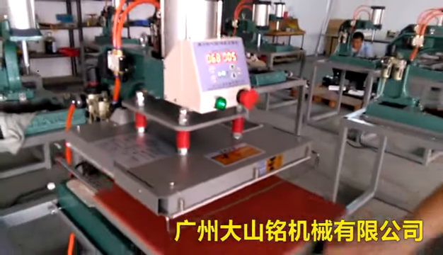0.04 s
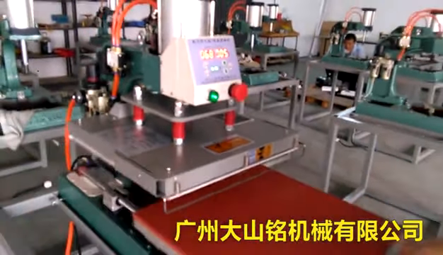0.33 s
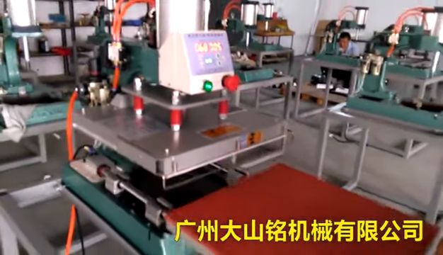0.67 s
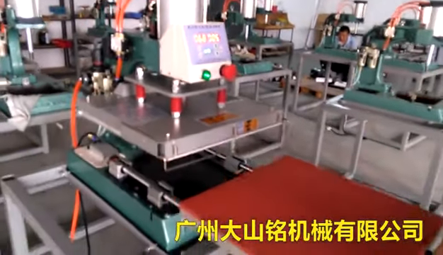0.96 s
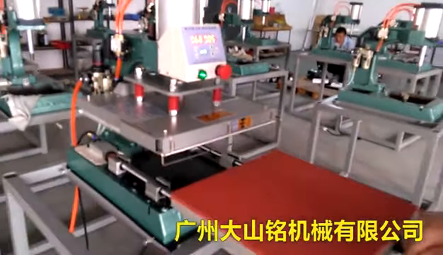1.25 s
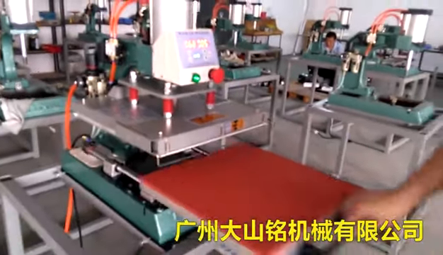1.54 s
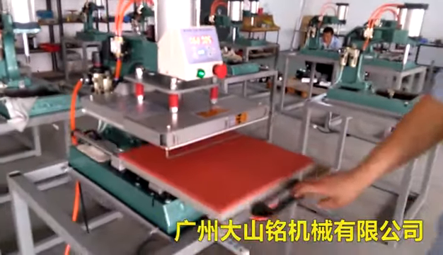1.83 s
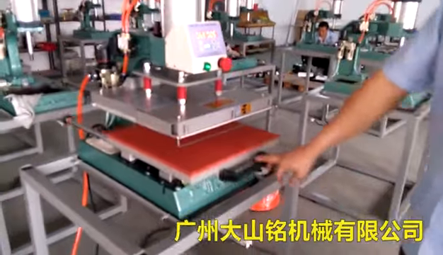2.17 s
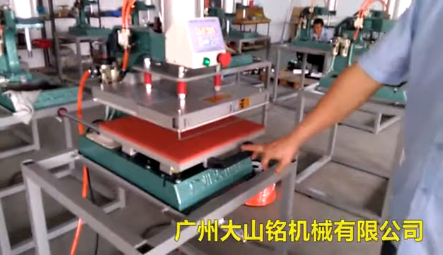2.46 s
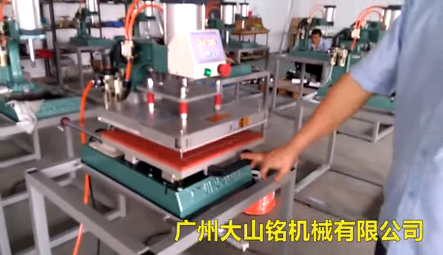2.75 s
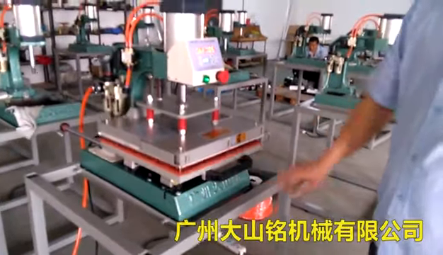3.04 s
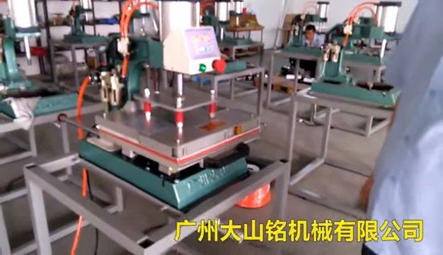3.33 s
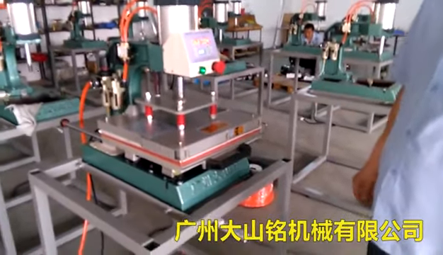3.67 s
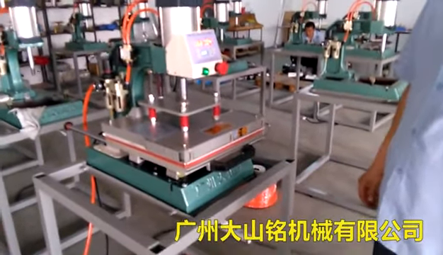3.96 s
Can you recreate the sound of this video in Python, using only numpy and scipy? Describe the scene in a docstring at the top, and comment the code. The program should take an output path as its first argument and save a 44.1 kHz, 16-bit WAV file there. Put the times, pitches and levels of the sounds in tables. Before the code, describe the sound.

A wheel grinds metal with a loud, high hiss over humming motors in a machine shop. Close by, a press tray rolls out and back, then air hisses briefly while the grinding rings with shrill tones.

```python
"""A spinning wheel grinds metal in a machine shop: its grit rings the workpiece in a loud hiss,
and tones sing out as the wheel bites. Motors hum and the hall roars behind it.
Close by, the tray of a pneumatic heat press rolls out and back in on ball-bearing rails,
then air hisses from the cylinder as the platen comes down."""
import sys
import numpy as np
from scipy import signal
from scipy.fft import rfft, irfft
from scipy.io import wavfile
from scipy.ndimage import map_coordinates

SR = 44100
rng = np.random.default_rng(int(sys.argv[2]) if len(sys.argv) > 2 else 0)


def store_wav(level_fs):
    """Save 16-bit WAV to argv[1]."""
    pcm = np.round(np.clip(np.atleast_2d(level_fs), -1, 1) * 32767)
    wavfile.write(sys.argv[1], SR, pcm.T.astype(np.int16))


N = 176400
T = np.arange(N) / SR
FREQ_HZ = np.fft.rfftfreq(N, 1 / SR)
TURN_HZ, CUTOFF_HZ = 41.165, 7580


def from_db(db):
    """Decibels to gain."""
    return 10 ** (np.asarray(db) / 20)


def unit_rms(x):
    """Scale to rms 1."""
    return x / np.sqrt(np.mean(x ** 2) + 1e-20)


def envelope(rows):
    """Gain over time from (time [s], level [dB]) rows."""
    return from_db(np.interp(T, *np.transpose(rows)))


def drift(rate_hz):
    """Random wander, mostly below rate_hz; rms 1."""
    steps = np.arange(-SR, N + SR, 50)
    hz = np.fft.rfftfreq(len(steps), 50 / SR)
    slow = irfft(rfft(rng.standard_normal(len(steps))) / (1 + (hz / rate_hz) ** 2), len(steps))
    return np.interp(T * SR, steps, unit_rms(slow))


def coloured(x, points):
    """Filter by (frequency [Hz], gain [dB]) points, steep beyond the ends; rms 1."""
    hz, db = np.transpose(points)
    f = FREQ_HZ + 1e-3
    skirts = np.minimum(1, np.minimum(f / hz[0], hz[-1] / f)) ** 6
    gain = from_db(np.interp(np.log(f), np.log(hz), db))
    return unit_rms(irfft(rfft(x) * skirts * gain, N))


def patchy(x, centres_hz, depth_db, rate_hz):
    """Each band's level flickers separately; rms 1."""
    spectrum = rfft(x)
    bands = (irfft(spectrum * np.interp(FREQ_HZ, centres_hz, row), N) for row in np.eye(len(centres_hz)))
    return unit_rms(sum(band * from_db(depth_db * drift(rate_hz)) for band in bands))


def resonate(x, modes):
    """Parallel resonances from (frequency [Hz], width [Hz], rms level [dB]) rows."""
    out = 0
    for hz, width_hz, db in modes:
        band = signal.butter(2, [hz - width_hz / 2, hz + width_hz / 2], "band", fs=SR, output="sos")
        out = out + from_db(db) * unit_rms(signal.sosfilt(band, x))
    return out


def stroke(start_s, stop_s, attack_s, release_s):
    """Linear rise centred on start_s, exponential decay from stop_s."""
    rise = np.clip((T - start_s) / attack_s + .5, 0, 1)
    return rise * np.exp(-np.maximum(T - stop_s, 0) / release_s)


def in_hall(x, t60_s=.5, wet_db=-.5):
    """Add the hall's diffuse tail; rms 1."""
    tail = rng.standard_normal(SR) * from_db(-60 * T[:SR] / t60_s)
    wet = signal.fftconvolve(x, tail / np.linalg.norm(tail))[:N]
    return unit_rms(x + from_db(wet_db) * wet)


def hall():
    """Far machines roar, one drones in a cluster of resonances; a low rumble underneath."""
    # spectra: (frequency [Hz], gain [dB])
    roar_colour = [(70, -20.5), (141, -10), (170, -18), (215, -18), (254, -7.5), (301, -10.5), (346, -9.5),
                   (399, -9.5), (452, -2.5), (560, -6.5), (624, -7.5), (680, -4), (760, -5), (900, -10),
                   (1080, -10), (1250, -8.5), (1340, -3.5), (1450, -8.5), (1640, -13.5), (2000, -12.5)]
    rumble_colour = [(12, -2), (25, 2.5), (48, -7.5), (65, -8), (110, -15), (200, -15)]
    # far machine's resonances: (frequency [Hz], width [Hz], relative level [dB])
    drone_modes = [(815, 39, -3.5), (884.7, 23.7, -2), (938.5, 33.4, 0), (990, 32, -4)]
    # envelopes: (time [s], level [dB])
    roar_level = [(0, -29), (.35, -28.5), (1.1, -31), (2, -33), (3, -30.5), (4, -32.5)]
    drone_level = [(0, -30.5), (.5, -38), (.8, -31.5), (1.05, -35.5), (1.2, -33), (1.7, -29.5),
                   (2.05, -33.5), (2.3, -36), (2.7, -33.5), (3.2, -37), (3.5, -29.5), (3.9, -27)]
    rumble_level = [(0, -37), (.7, -37.5), (1.12, -51), (1.35, -38), (1.72, -44), (2.3, -41.5), (2.8, -38),
                    (3.1, -45.5), (4, -38)]
    roar = coloured(rng.standard_normal(N), roar_colour)
    roar = patchy(roar, np.geomspace(150, 1800, 22), depth_db=3, rate_hz=7.3)
    drone = unit_rms(resonate(rng.standard_normal(N), drone_modes))
    rumble = coloured(rng.standard_normal(N), rumble_colour)
    return envelope(roar_level) * roar + envelope(drone_level) * drone + envelope(rumble_level) * rumble


def motors(waver_hz=1.98, waver_db=4):
    """Motor tones waver on their way through the hall; each swells or dips once."""
    # hum and whine: (frequency [Hz], level [dB], swell time [s], swell [dB], swell width [s])
    tones = [(50.4, -49.5, 0.27, 14, 0.34), (147.6, -59, 4, 7, .5), (251.6, -50, 0.24, 11.5, 0.8),
             (444, -51.5, 3.9, 16, 0.089), (456, -49, 0.18, 12.5, 0.31), (485, -51, 1.1, 14.5, 0.13),
             (513, -49, 2.4, -4, 0.34), (672.5, -53.5, 0.32, 18.5, 0.2), (816, -45, 3.2, 8, 0.1),
             (895, -49.5, 3.5, 18, 1), (932, -44.5, 1.7, 11, 0.33), (1334, -44.5, 0.091, 9.5, 0.75),
             (1397, -49, .7, -3, .4), (2075, -52.5, .1, 15, 0.29)]
    out = 0
    for hz, db, centre_s, peak_db, width_s in tones:
        swell_db = peak_db * np.exp(-.5 * ((T - centre_s) / width_s) ** 2)
        phase = 2 * np.pi * np.cumsum(hz + waver_hz * drift(10.04)) / SR
        out = out + from_db(db + swell_db + waver_db * drift(4.9)) * np.sin(phase)
    return out


def tray(hits_per_s=3000, spread_db=2, rattle_db=3.2):
    """Bearing balls patter along the rails: the tray runs unevenly and booms, the rails hiss."""
    # tray moves: (start [s], stop [s], boom level [dB], hiss level [dB])
    slides = [(0.559, 0.786, -26.5, -31), (0.892, 0.94, -28, -29), (1.4, 1.713, -38, -33.5),
              (1.76, 2.117, -28.5, -30), (2.187, 2.38, -36.5, -31.5)]
    # tray resonances: (frequency [Hz], width [Hz], relative level [dB])
    tray_modes = [(260, 61, -3), (341, 45, 6.5), (388, 50, -4.5), (517, 120, -6.5), (754, 220, -3.5)]
    # rail spectrum: (frequency [Hz], gain [dB])
    rail_colour = [(300, -32.5), (700, -15), (1450, 7.5), (1800, 2), (2250, 4), (2800, 1.5), (3700, 2.5),
                   (5000, -23), (7500, -15)]
    sizes = from_db(spread_db * np.minimum(rng.exponential(1, N), 5)) * rng.choice([-1, 1], N)
    hits = in_hall(sizes * (rng.random(N) < hits_per_s / SR))
    boom = unit_rms(resonate(hits, tray_modes) * from_db(rattle_db * drift(25)))
    hiss = coloured(hits, rail_colour)
    return sum(from_db(boom_db) * stroke(start_s, stop_s, attack_s=.022, release_s=.098) * boom
               + from_db(hiss_db) * stroke(start_s, stop_s, attack_s=.6, release_s=.1) * hiss
               for start_s, stop_s, boom_db, hiss_db in slides)


def air():
    """Air leaves the cylinder as the platen comes down."""
    # exhaust spectrum: (frequency [Hz], gain [dB])
    air_colour = [(600, -11), (1500, -0.5), (2200, 5.5), (3000, -4), (3700, 9.5), (4500, -8), (7500, -23)]
    flow = stroke(start_s=2.37, stop_s=2.57, attack_s=.049, release_s=.28)
    return from_db(-27.5) * flow * coloured(rng.standard_normal(N), air_colour)


def grit(turns, wear_per_turn=.09, repeat_share=.22):
    """The wheel's rough face comes round every turn, slowly wearing, mixed with fresh grains."""
    turn_samples = int(SR / TURN_HZ)
    roughness = rng.standard_normal((2 * int(N / turn_samples), turn_samples))
    face = signal.lfilter([1], [1, -(1 - wear_per_turn)], roughness, axis=0).ravel()
    repeating = unit_rms(map_coordinates(face[-N - SR:], [turns * turn_samples], order=3))
    return np.sqrt(repeat_share) * repeating + np.sqrt(1 - repeat_share) * rng.standard_normal(N)


def grinding_hiss(turns):
    """Grit rings the workpiece; the lower hiss swings more with grinding strength."""
    # workpiece ring: (frequency [Hz], gain [dB])
    ring_colour = [(1700, -32.5), (2000, -18.5), (2300, -18), (2600, -20), (2900, -17), (3500, -24),
                   (3800, -15.5), (4250, -6), (4600, -4.5), (4950, -6), (5300, -2.5), (5700, -6.5),
                   (5900, 0.5), (6100, 1.5), (6500, -1), (6750, -2.5), (6980, 1), (7200, -7.5), (7560, -6)]
    # grinding strength: (time [s], relative level [dB])
    grind_level = [(0, -14), (.15, -15), (.32, -17.5), (.52, -15), (.72, -12), (.9, -14.5), (1.29, -16),
                   (1.37, -13), (1.9, -14), (2.15, -14.5), (2.4, -13), (2.72, -13), (2.9, -14.8),
                   (3.22, -14.5), (3.6, -14.5), (4, -13)]
    hiss = coloured(grit(turns), ring_colour)
    hiss = patchy(hiss, np.linspace(2000, CUTOFF_HZ, 16), depth_db=1.62, rate_hz=19)
    lower = irfft(rfft(hiss) * (FREQ_HZ < 5600), N)
    strength = envelope(grind_level)
    extra_swing = (strength / from_db(-15.5)) ** .3
    return from_db(-1.49) * strength * (hiss - lower + lower * extra_swing)


def grinder(speed_spread=.000512, waver_db=4, throb_db=.37, flutter_db=.38):
    """The wheel hisses in unsteady contact; as it bites, resonances sharpen and harmonics sing."""
    # singing harmonics: (multiple of the turning rate, level [dB])
    harmonics = [(49, -47.5), (50, -47), (55, -48), (58, -51), (59, -51), (112, -29.5), (113, -33.5),
                 (116, -43.5), (125, -44), (130, -36.5), (131, -32), (142, -31), (145, -31.5), (146, -31.5),
                 (147, -32.5), (148, -36.5), (163, -39), (170, -48), (172, -38)]
    # resonances under bite: (frequency [Hz], width [Hz], level [dB])
    bite_modes = [(2286, 180, -38.5), (4634, 99, -28.5), (5354, 140, -26.5), (6095, 270, -27.5),
                  (6760, 180, -29)]
    turns = np.cumsum(TURN_HZ * (1 + speed_spread * drift(2.17))) / SR
    hiss = grinding_hiss(turns)
    singing = sum(from_db(db + waver_db * drift(4)) * np.sin(2 * np.pi * (k * turns + rng.random()))
                  for k, db in harmonics)
    bite = np.interp(T, [.95, 2.08], [0, 1])
    contact = from_db(throb_db * np.sin(2 * np.pi * turns) + flutter_db * drift(40))
    ringing = resonate(grit(turns), bite_modes)
    return contact * (hiss + bite * (ringing + singing))


def scene():
    """All sources, the same in both channels."""
    return np.tile(grinder() + motors() + hall() + tray() + air(), (2, 1))


def record(dry):
    """Steep low-pass."""
    return signal.sosfilt(signal.ellip(18, .1, 90, CUTOFF_HZ, fs=SR, output="sos"), dry)


dry = scene()
out = record(dry)
store_wav(out)
```